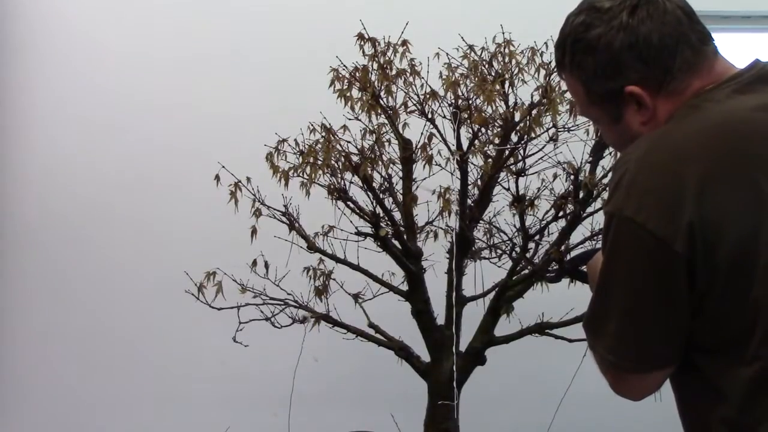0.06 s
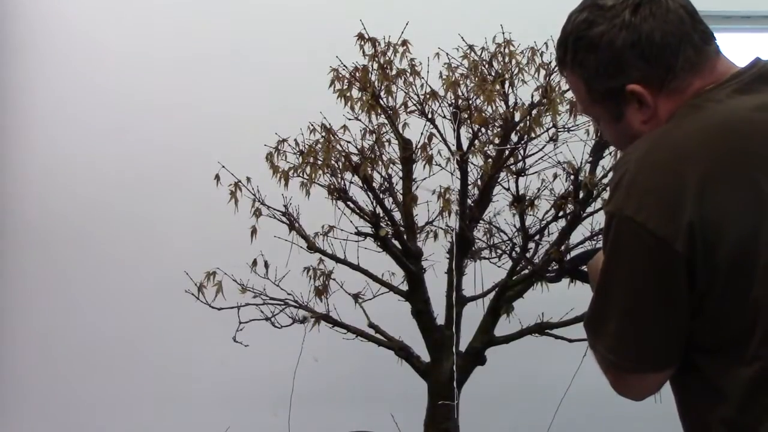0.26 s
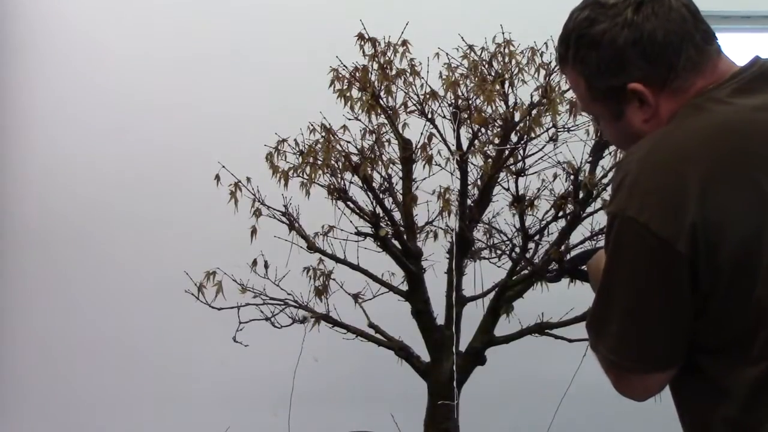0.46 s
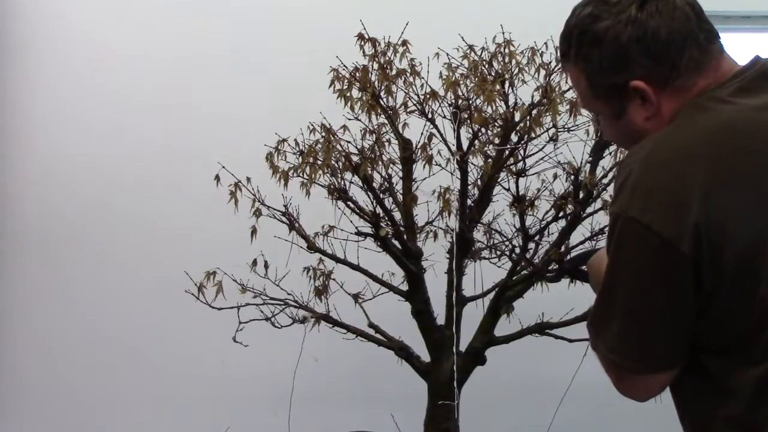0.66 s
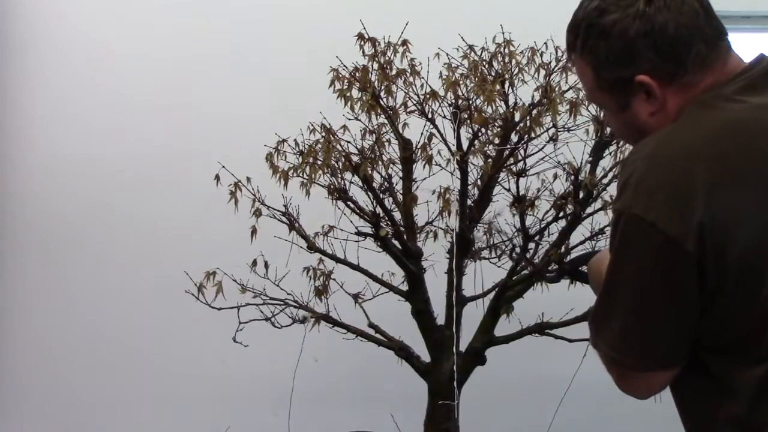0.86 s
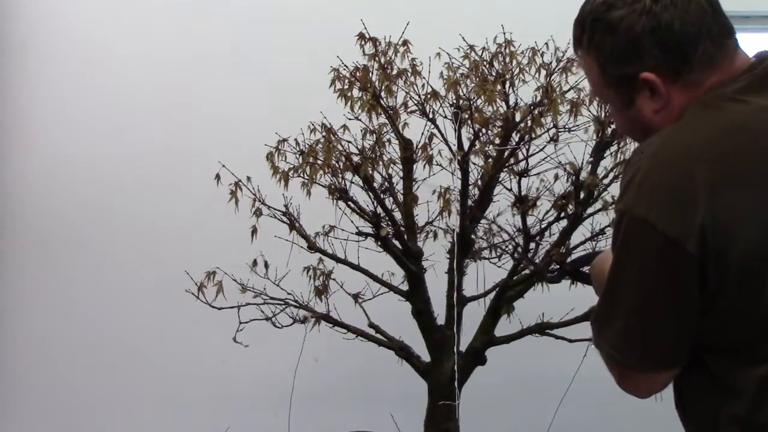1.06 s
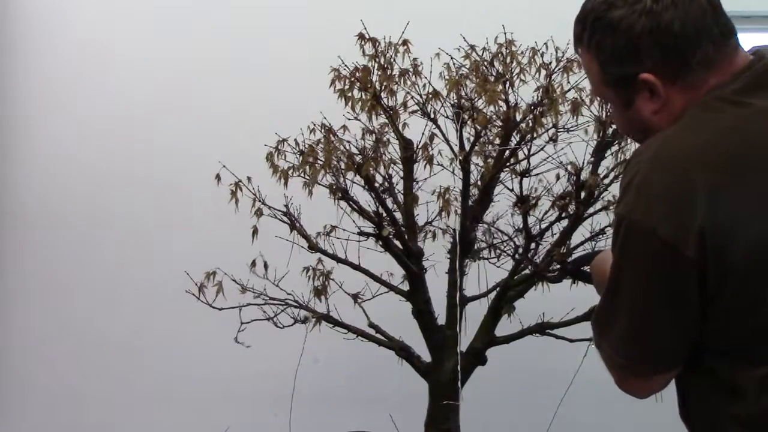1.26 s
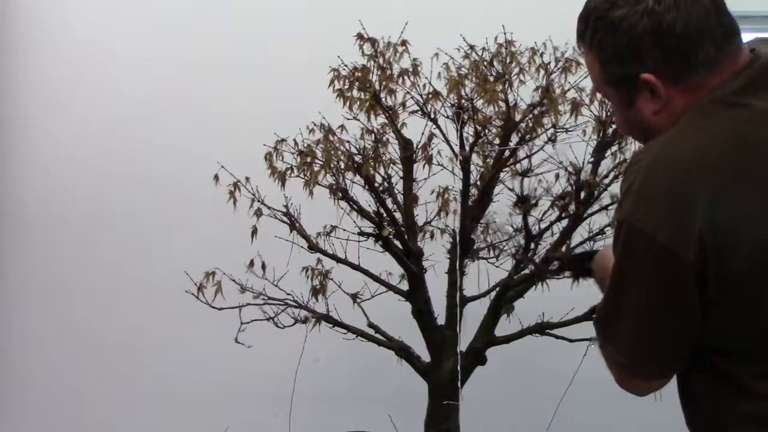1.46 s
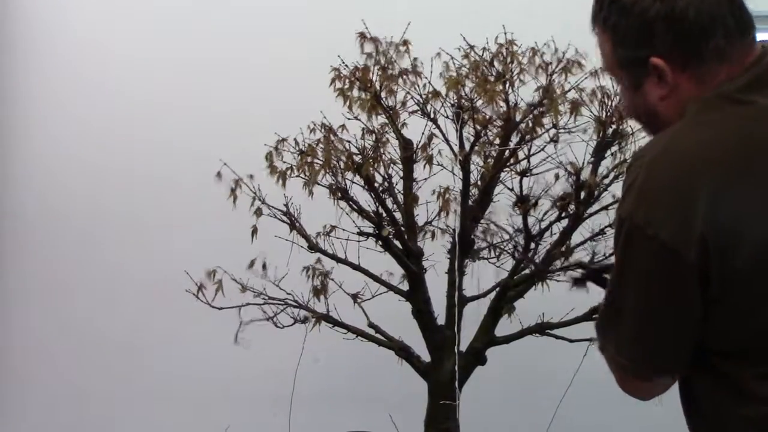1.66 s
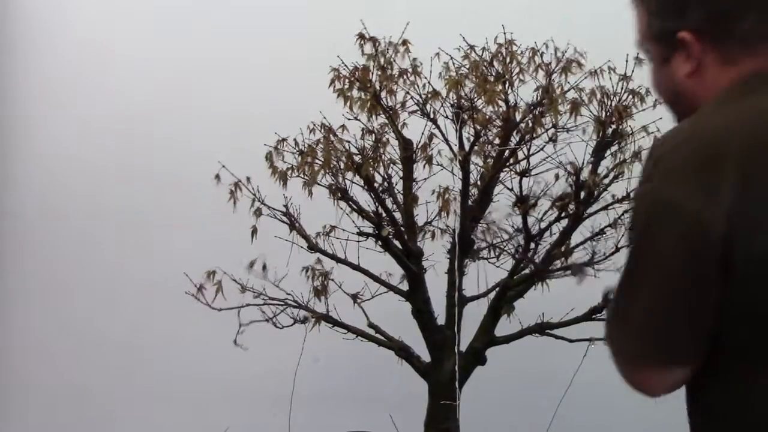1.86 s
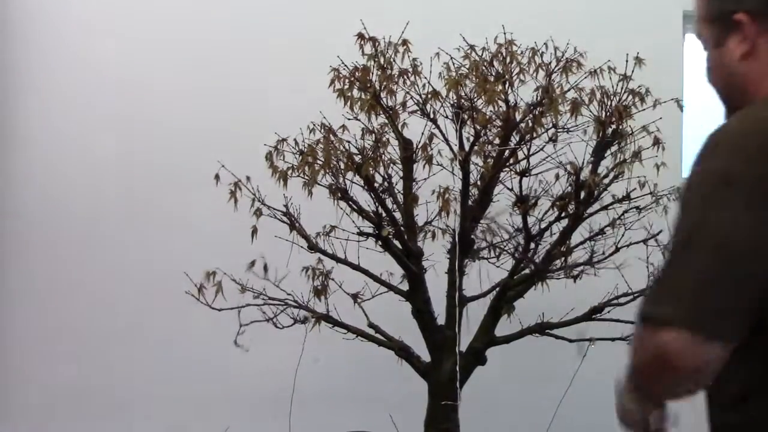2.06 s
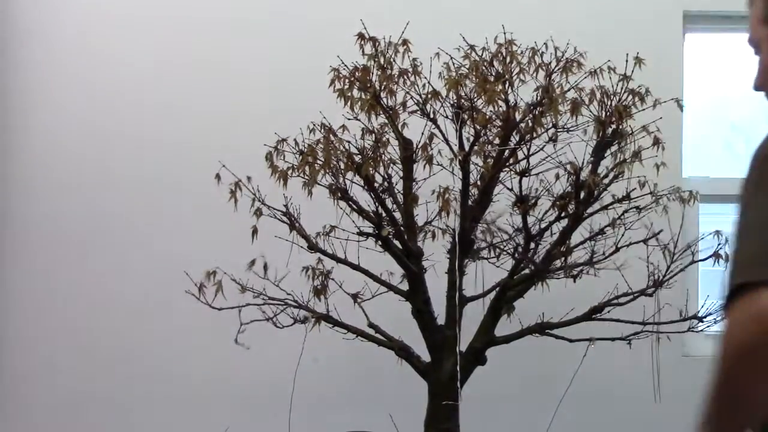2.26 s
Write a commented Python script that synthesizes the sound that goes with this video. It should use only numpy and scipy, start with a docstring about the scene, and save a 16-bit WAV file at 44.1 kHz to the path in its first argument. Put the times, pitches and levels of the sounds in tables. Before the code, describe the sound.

One hard, splintery snip of cutters severing a small tree branch, ringing briefly in a bare room

```python
"""In a quiet, bare room, pruning cutters snap through a woody branch: decaying noise bursts are the breaking
fibres, and damped sines struck by the last break are the ringing steel. Twigs rustle (sparse random clicks) as
the piece is drawn out, something hard ticks and rebounds (filtered impulses), then come dull footfalls
(floor modes and noise bursts) and a scuff (swelling noise). Faint filtered noise lies under it all."""
import sys
import numpy as np
from scipy import signal
from scipy.fft import rfft, irfft, next_fast_len
from scipy.io import wavfile

SR = 44100
rng = np.random.default_rng(int(sys.argv[2]) if len(sys.argv) > 2 else 0)


def to_wav(sig):
    """Store sig (one row per channel, or 1-D mono) as 16-bit WAV at the path in sys.argv[1].

    Samples outside -1..1 are clipped; the rate is SR.
    """
    pcm = np.clip(np.atleast_2d(sig), -1, 1) * 32767
    pcm = np.round(pcm).astype(np.int16)
    wavfile.write(sys.argv[1], SR, pcm.T)  # frames by channels


N = 102091
T = np.arange(N) / SR
SIZE = 2 * next_fast_len(3 * N // 4)  # FFT length, padded
BINS_HZ = np.arange(SIZE // 2 + 1) * SR / SIZE


def undb(db):
    """Decibels to amplitude gain."""
    return 10 ** (np.asarray(db) / 20)


def along(points, hz):
    """Read a (Hz, value) table on a log-frequency axis."""
    table_hz, values = np.array(points).T
    return np.interp(np.log(hz + 1), np.log(table_hz), values)


def shade(x, gain):
    """Weight each frequency bin by a gain."""
    return irfft(rfft(x, SIZE) * gain, SIZE)[..., :N]


def colour(x, points):
    """Minimum-phase filter of unit energy with the given spectrum, falling below its first point."""
    bass_fall = np.minimum((BINS_HZ + 1) / points[0][0], 1) ** 2
    gain = undb(along(points, BINS_HZ)) * bass_fall
    unit_gain = gain / np.sqrt(np.mean(gain ** 2))
    # folding the cepstrum makes the filter causal
    cepstrum = irfft(np.log(unit_gain), SIZE)
    cepstrum[1:SIZE // 2] *= 2
    return shade(x, np.exp(rfft(cepstrum[:SIZE // 2], SIZE)))


def convolve(x, response):
    """Pass a sound through an impulse response."""
    return signal.fftconvolve(x, response)[:N]


def lowpass(x, hz):
    """Steep treble cut."""
    return signal.sosfilt(signal.ellip(12, .1, 100, hz, fs=SR, output="sos"), x)


def highpass(x, hz):
    """Steep bass cut."""
    return signal.sosfilt(signal.butter(4, hz, "high", fs=SR, output="sos"), x)


def blows(rows):
    """One impulse for each (s, dB) row."""
    out = np.zeros(N)
    for start_s, db in rows:
        out[int(start_s * SR)] += undb(db)
    return out


def bursts(rows, decay_s):
    """Noise after each (s, dB) row, its amplitude falling by 1/e per decay_s."""
    power_hits = blows([(start_s, 2 * db) for start_s, db in rows])
    power = convolve(power_hits, np.exp(-2 * T / decay_s))
    return rng.standard_normal(N) * np.sqrt(np.abs(power) * 2 / (decay_s * SR))


def ring(modes):
    """Sum of exponentially damped sines; successive modes start in opposite directions."""
    out = np.zeros(N)
    for k, (hz, db, t60_s) in enumerate(modes):
        decay = np.exp(-np.log(1000) * T / t60_s)
        out += (-1) ** k * undb(db) * np.sin(2 * np.pi * hz * T) * decay
    return out


def swell(centre_s, sigma_s, db):
    """Gaussian envelope."""
    return undb(db) * np.exp(-.5 * ((T - centre_s) / sigma_s) ** 2)


# Fibre breaks. Each row: start in seconds, level in dB, splintering decay in seconds.
FIBRE_BREAKS = [(1.4749, -19.5, 0.0049), (1.4777, -15.5, .005), (1.4800, -1.5, 0.0029),
                (1.4832, -0.5, 0.0045), (1.4862, 1, 0.0016), (1.4896, -1.5, 0.0016), (1.493, -0.5, 0.0042)]
# Wood spectrum. Each row: frequency in Hz, relative density in dB per Hz.
WOOD_SPECTRUM = [(40, -45), (130, -25), (280, -11.5), (450, -4.5), (650, -8), (800, -8.5), (1200, -10),
                 (1600, -3.5), (2200, -1.5), (2550, -5), (3300, -4.5), (4200, -5.5), (5400, -4), (7000, -6),
                 (8800, -12.5), (10000, -7.5), (11200, -14), (15000, -21.5)]
# Steel modes of the cutters. Each row: frequency in Hz, relative level in dB, 60 dB decay in seconds.
CUTTER_MODES = [(663, -3, .24), (1494, -3, .22), (1536, -2, .22), (1881, -1, .23), (1911, -2, .23),
                (2256, 2.5, .38), (2343, 0, .34), (3138, 1, .26), (3335, 1, .27), (3539, -1, .26),
                (3946, -1, .26), (4155, -2, .26), (4364, 1, .27), (5265, 3, .3), (6770, -2, .23),
                (9927, 2, .29), (9990, -3, .28)]
SNAP_DB, SNAP_ROOM_DB = 7, 0
RING_DB, RING_ROOM_DB, RING_LOW_HZ = -31, -13, 295


def snap():
    """Fibres splinter one after another, each with its own echoes; the last break rings the cutters."""
    cracks = np.zeros((2, N))
    for start_s, db, decay_s in FIBRE_BREAKS:
        cracks += room(bursts([(start_s, db)], decay_s), SNAP_ROOM_DB)
    last_break = blows([FIBRE_BREAKS[-1][:2]])
    steel = highpass(convolve(last_break, ring(CUTTER_MODES)), RING_LOW_HZ)
    return undb(SNAP_DB) * colour(cracks, WOOD_SPECTRUM) + room(undb(RING_DB) * steel, RING_ROOM_DB)


# Twig brushes. Each row: centre in seconds, Gaussian sigma in seconds, level in dB.
RUSTLES = [(1.804, 0.027, -65), (1.858, 0.006, -60), (1.901, .01, -64), (1.942, 0.0082, -65.5),
           (2.002, 0.034, -72)]
# Twig spectrum. Each row: frequency in Hz, relative density in dB per Hz.
TWIG_SPECTRUM = [(300, -3), (1000, 4.5), (2500, 0), (5500, -1), (9000, -8), (15000, -16)]
CLICKS_PER_S, CLICK_SPREAD_DB, TWIG_ROOM_DB = 940, 2, 5.5


def twigs():
    """Tiny uneven clicks as twigs slide past each other."""
    is_click = rng.random(N) < CLICKS_PER_S / SR
    strength = rng.standard_normal(N) * undb(CLICK_SPREAD_DB * rng.standard_normal(N))
    clicks = is_click * strength
    brushing = sum(swell(*row) for row in RUSTLES)
    return room(colour(clicks / clicks.std() * brushing, TWIG_SPECTRUM), TWIG_ROOM_DB)


# Hard contact and rebounds. Each row: start in seconds, relative level in dB.
TICK_CONTACTS = [(2.0608, 0), (2.0640, -12.5), (2.0655, -13.5)]
# Tick spectrum. Each row: frequency in Hz, relative density in dB per Hz.
TICK_SPECTRUM = [(290, -77), (500, -37), (676, -18.5), (1120, -9.5), (1470, -12.5), (2100, -5.5), (6830, 1),
                 (14000, -9.5), (15500, -22)]
TICK_DB, TICK_ROOM_DB = -7.5, 4


def tick():
    """A small hard contact that rebounds twice, as filtered impulses."""
    return room(undb(TICK_DB) * colour(blows(TICK_CONTACTS), TICK_SPECTRUM), TICK_ROOM_DB)


# Heel and sole contacts. Each row: start in seconds, relative level in dB.
STEPS = [(2.1045, -9), (2.121, -13), (2.204, -9), (2.210, -1), (2.232, -4), (2.265, -7)]
# Floor modes. Each row: frequency in Hz, relative level in dB, 60 dB decay in seconds.
FLOOR_MODES = [(256, -1, 0.087), (333, 0.5, 0.038), (383, 1, 0.043), (527, -8.5, 0.027), (695, -8, 0.023),
               (965, -18, 0.035)]
# Sole spectrum. Each row: frequency in Hz, relative density in dB per Hz.
SOLE_SPECTRUM = [(220, -2), (300, 6), (600, -3), (1300, -9.5), (1800, -23), (6000, -47)]
# Shoe scuff. Single row: centre in seconds, Gaussian sigma in seconds, level in dB.
SCUFF = (2.276, 0.012, -48.5)
# Scuff spectrum. Each row: frequency in Hz, relative density in dB per Hz.
SCUFF_SPECTRUM = [(1000, -0.5), (2100, -14), (2550, 4), (2950, -1), (3700, -17), (9000, -31)]
KNOCK_DB, KNOCK_ROOM_DB, FLOOR_LOW_HZ = -29, -2.5, 180
SOLE_DB, SOLE_DECAY_S, SOLE_GIVE_S, SHOE_ROOM_DB = -14, 0.0053, 0.0023, -4


def footsteps():
    """Soft shoes knock damped floor modes, and one scuffs; the sole's give softens the onset."""
    onset = (1 - np.exp(-T / SOLE_GIVE_S)) ** 2
    floor = ring(FLOOR_MODES) * onset
    knock = undb(KNOCK_DB) * highpass(convolve(blows(STEPS), floor), FLOOR_LOW_HZ)
    sole = undb(SOLE_DB) * colour(bursts(STEPS, SOLE_DECAY_S), SOLE_SPECTRUM)
    scuff = swell(*SCUFF) * colour(rng.standard_normal(N), SCUFF_SPECTRUM)
    return room(knock, KNOCK_ROOM_DB) + room(sole + scuff, SHOE_ROOM_DB)


# Room noise spectrum. Each row: frequency in Hz, relative density in dB per Hz.
AIR_SPECTRUM = [(15, -56), (25, -26), (64, -15.5), (86, -2), (118, -3.5), (357, -1), (503, -3), (604, -3.5),
                (897, -6), (971, -4), (1140, -8.5), (2500, -12.5), (3170, -13), (3430, -15), (13500, -29)]
# Room noise width. Each row: frequency in Hz, side gain in dB.
AIR_WIDTH = [(60, -12.5), (250, -3), (700, -5.5), (2400, -8.5), (12000, -11)]
AIR_DB, AIR_TOP_HZ = -59, 13700


def air():
    """Steady, faint room noise: independent mid and side noises."""
    mid = colour(rng.standard_normal(N), AIR_SPECTRUM)
    side = colour(rng.standard_normal(N), AIR_SPECTRUM)
    side = shade(side, undb(along(AIR_WIDTH, BINS_HZ)))
    return undb(AIR_DB) * lowpass(np.array([mid + side, mid - side]), AIR_TOP_HZ)


# Room decay. Each row: frequency in Hz, 60 dB decay in seconds.
ROOM_T60 = [(150, 0.5), (500, 0.38), (1200, 0.44), (2500, 0.38), (5000, 0.46), (9000, 0.32), (15000, 0.16)]
ROOM_BUILD_S = 0.0013


def tail():
    """Diffuse room response of unit energy; each octave dies at its own rate."""
    t = T[:2 ** 15]
    noise = rfft(rng.standard_normal(len(t)))
    bins_hz = np.arange(len(noise)) * SR / len(t)
    octave = np.log2(np.clip(bins_hz, 125, 16000) / 125)
    out = np.zeros(len(t))
    for k in range(8):
        t60_s = along(ROOM_T60, 125 * 2 ** k)
        band = irfft(noise * np.maximum(1 - np.abs(octave - k), 0))
        out += band * np.exp(-np.log(1000) * t / t60_s)
    out *= 1 - np.exp(-t / ROOM_BUILD_S)
    return out / np.sqrt(np.sum(out ** 2))


# Reverberation width. Each row: frequency in Hz, side gain in dB.
ROOM_WIDTH = [(100, -34), (400, -39), (1300, -51), (2400, -21.5), (4400, -16.5), (8000, -10), (12500, -9)]


def room(x, wet_db):
    """Centred direct sound and reverberation, widened by a second tail of opposite sign per channel."""
    mid = x + undb(wet_db) * convolve(x, tail())
    side = undb(wet_db) * shade(convolve(x, tail()), undb(along(ROOM_WIDTH, BINS_HZ)))
    return np.array([mid + side, mid - side])


def scene():
    """All sounds in the room."""
    return snap() + twigs() + tick() + footsteps() + air()


TOP_HZ = 15800


def record(dry):
    """Steep treble cut above TOP_HZ."""
    return lowpass(dry, TOP_HZ)


dry = scene()
out = record(dry)
to_wav(out)
```